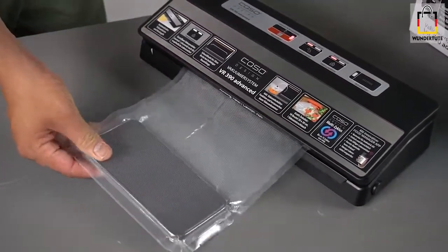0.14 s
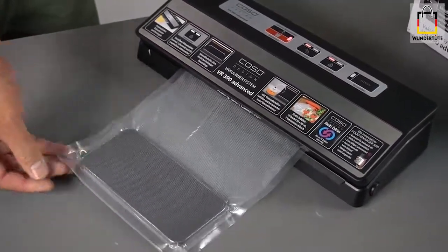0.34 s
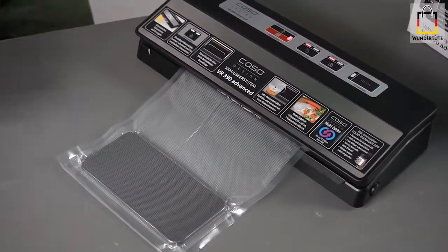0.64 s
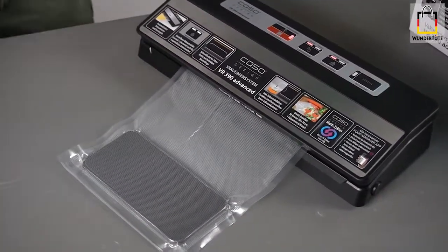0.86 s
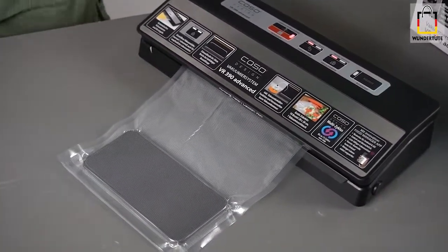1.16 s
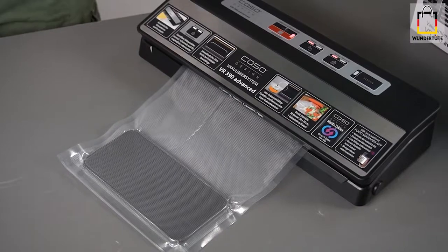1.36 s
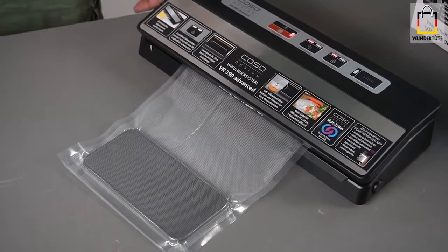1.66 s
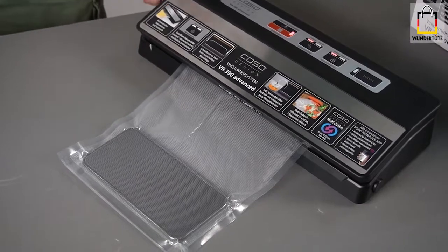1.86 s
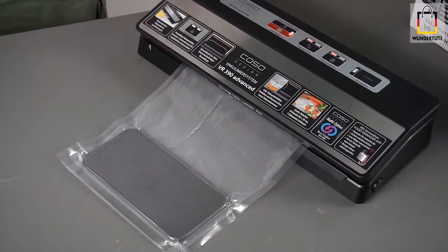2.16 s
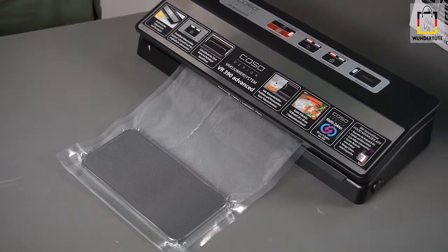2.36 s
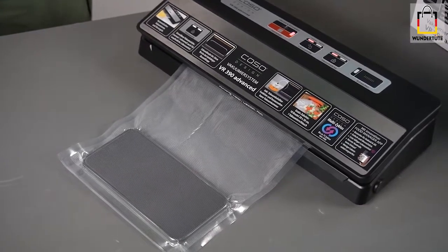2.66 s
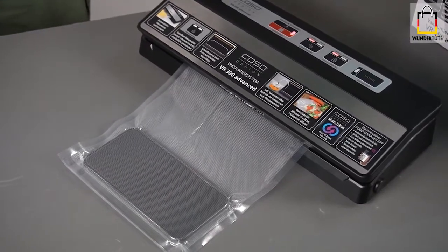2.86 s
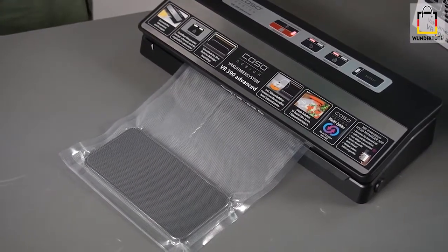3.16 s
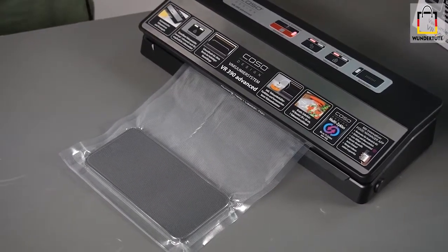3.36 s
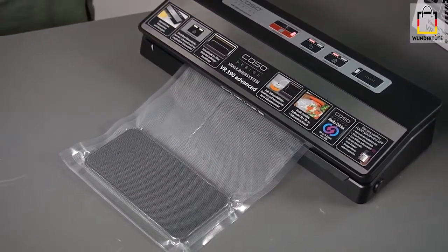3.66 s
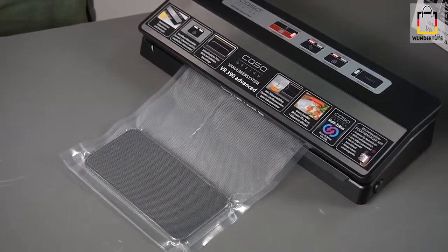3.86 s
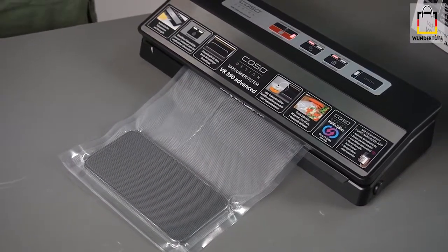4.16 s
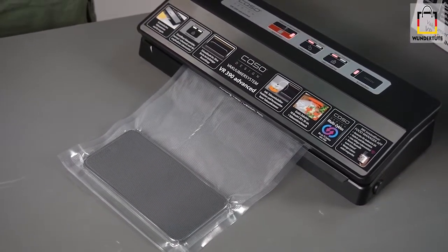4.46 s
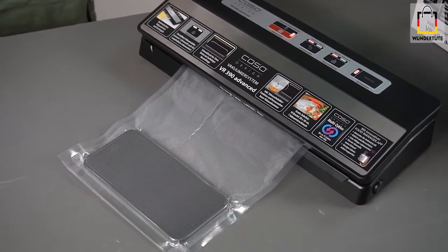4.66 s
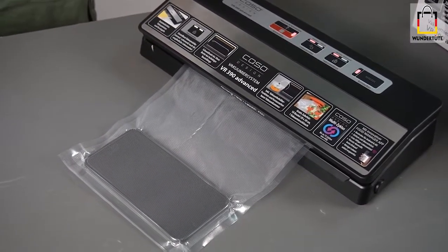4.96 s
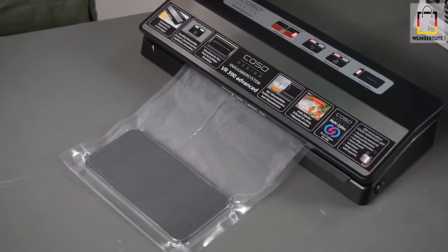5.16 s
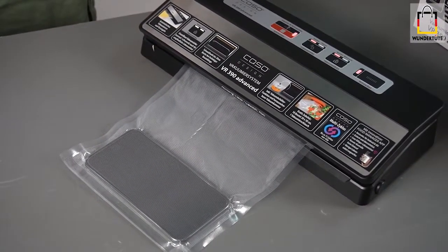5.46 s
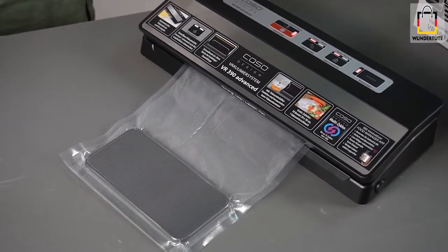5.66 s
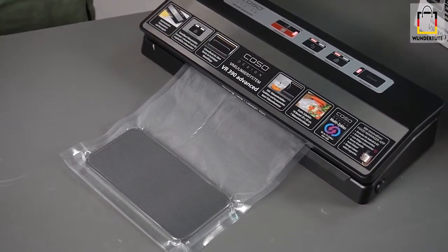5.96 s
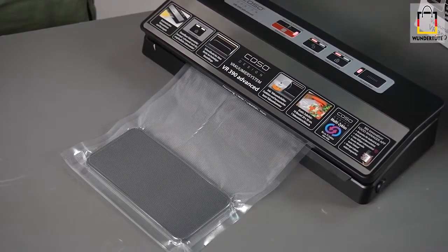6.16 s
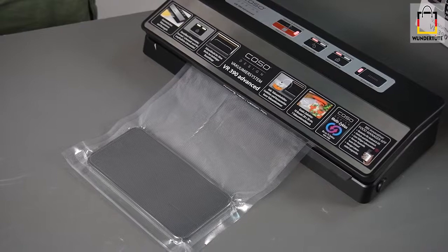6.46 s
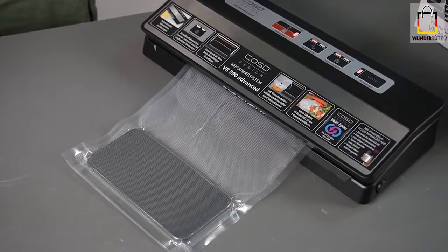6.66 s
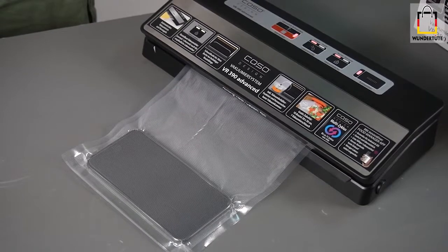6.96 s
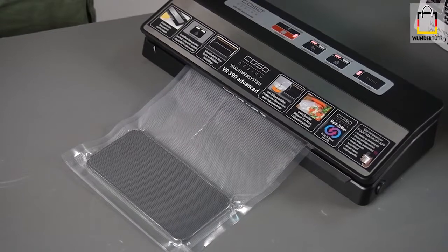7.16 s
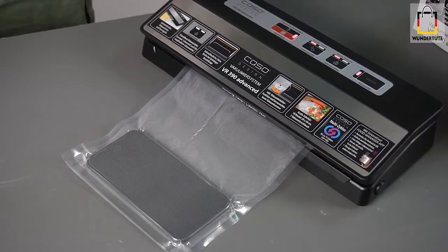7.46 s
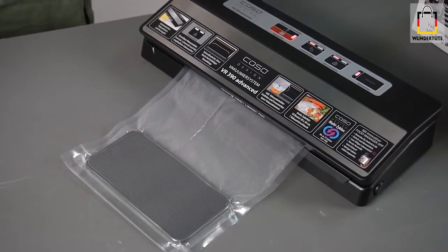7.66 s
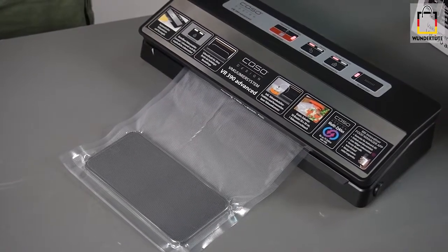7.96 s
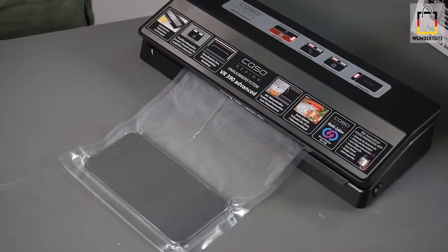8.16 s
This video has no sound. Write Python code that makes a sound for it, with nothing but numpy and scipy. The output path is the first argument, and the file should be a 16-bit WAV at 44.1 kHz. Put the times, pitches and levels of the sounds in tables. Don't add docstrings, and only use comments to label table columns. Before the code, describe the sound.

Close, steady mechanical drone of a small vacuum sealer, with a bag set down early, fading air hiss, and a slight pitch drop midway.

```python
import sys
import numpy as np
from scipy import signal
from scipy.fft import rfft, irfft, next_fast_len
from scipy.io import wavfile

SR = 44100
rng = np.random.default_rng(int(sys.argv[2]) if len(sys.argv) > 2 else 0)


def attenuation_scalar(level_db):
    decades = np.asarray(level_db, float) / 20
    return 10 ** decades


def pcm_store(signal):
    levels = np.round(np.clip(np.atleast_2d(signal), -1, 1) * 32767)
    wavfile.write(sys.argv[1], SR, levels.astype(np.int16).T)


N = 366471
TIME = np.arange(N) / SR
PAD = 4096


def knock(turns):
    # centre_hz, width_hz,
    # signed strength with the bag lifted, lowered, released, emptying
    base_loose = [(206, 52, -17, -15, -4, -6.5), (262, 7.6, -13, -7, -13, -21),
                  (378, 112, 20.1, 22, 10, 8.5), (450, 26, 12, -6, 1, 8), (525.2, 38.6, 16, 25, 34, 24.5),
                  (563.5, 61, -23, -25, -26, -21.5), (770, 137, 11, 13, 1.5, -3.5),
                  (783, 17, 1, -9, -20, 4.5), (868, 150, -11, -6, 0.5, 3.5), (963.5, 20, 4, -8, -15, -8.5),
                  (1135, 9.1, 6, 1, 26, 10), (1172.4, 11.4, -1, 3, 14, 30)]
    lid_loose = [(1250, 70, 4.5, -9, -2, 6), (1373, 51, -26, 12, 8, -2.5), (1415, 8.1, 22, 22, -16, -17),
                 (1533, 34, -7, -28, 14, 13), (1587, 38, 14, 7, -29.5, -1), (1650, 92, -17, -9, 0.5, -10.5),
                 (2093, 78, -1, -9.5, 4.5, 0.5), (2187, 58, -12, -17, -17, 15), (2198, 107, 1, 23, 6.5, -8),
                 (2348, 58, 3, -5.5, -5.5, 4), (2650, 210, -10, 1.7, 1, 1.5), (2880, 34, 0, 2.5, 2.5, -1),
                 (3065, 44, -5, 2.5, -2, 2.5)]
    # centre_hz, width_hz,
    # signed strength with the lid seating, seated, vacuum reached, wire heating
    base_tight = [(206.6, 16.7, -9, -9, -8.5, -4.5), (275, 45, -11, -10, -12.5, -11),
                  (358, 22.7, 10.5, 8, 9, 9), (436.2, 11.1, 16, 25, 29, 4.5),
                  (529.1, 49.1, 27, 28, 36, 35.5), (589, 105.5, -14, -12.5, -13, -23),
                  (616, 13, -2, -5, -3, 19), (707, 136, 11, 12.2, 8.5, 13),
                  (762, 121, -10, -9.5, -7.5, -11), (915.7, 14.6, 11.5, 20, 12.5, -4),
                  (1016.4, 21.3, -11, -4.5, 2.5, -7.5)]
    lid_tight = [(1179.9, 47.2, -61, -37, -40, -56.5), (1184.4, 20, 58, 52, 45, 46),
                 (1227, 163, 19, 11.5, 14.5, 19), (1351.3, 31, -30, -16, -25.5, -30),
                 (1441.6, 11.6, -16, -52, -43, -35.5), (1531.3, 20, -11, -20, -41, -26),
                 (1578, 73.5, 18, 7, 3.5, 42.5), (1597, 53, -8, 3.5, 10.5, -30.5),
                 (1687, 7.6, -20, -13, 1.2, -14), (1780, 150, -4, -3.5, -2, -3.0),
                 (1995, 11.3, -4, -4, -2, 8)]
    housing_tight = [(2163, 74, 0, 0.5, 2.5, -3), (2202, 22, 7, 7.5, 3, 2), (2307, 52, -3.5, -3.5, -3, -2),
                     (2467, 13, 2.5, 6, 4, 4.5), (2566, 105, 4, 4, 2, 2.5), (2598, 35, -5.5, -6, -4, -4),
                     (2840, 47, -3, -1.5, 0, -0.5), (2896, 21, -2, 1.5, 1.5, 2.5),
                     (3125, 51.5, -3, -4, -4, -3)]
    stroke_db = [0, -0.32, 0.81, 1.8, 0.02, -0.66, -0.78, -0.023]
    hits = strokes(turns, scatter_db=.15, jitter_s=4e-6)
    loose = flutter(ring(base_loose + lid_loose), gap_s=.0043, direct=0.83)
    tight = flutter(ring(base_tight + lid_tight + housing_tight), gap_s=.0017, direct=0.98)
    responses = np.r_[loose, table_top(tight)]
    rung = signal.oaconvolve(hits[None], responses, axes=1)[:, PAD:PAD + N]
    return 1.346 * attenuation_scalar(stroke_db) @ (shares() * rung)


def crank():
    start_rpm, empty_rpm, sag_rpm = 2331.2, 2452.47, 75.44
    emptying_s, bend, first_turn = .9723, 1.3414, .3157
    air_load = np.exp(-(TIME / emptying_s) ** bend)
    rpm = empty_rpm - (empty_rpm - start_rpm) * air_load - sag_rpm * wire()
    return np.cumsum(rpm) / 60 / SR - first_turn


def wire():
    on_s, rise_s = 4.3544, .0489
    return np.clip((TIME - on_s) / rise_s, 0, 1)


def shares():
    # time_s, state (0-6)
    suction = [
        (0, 1.22),
        (.29, 1.8),
        (.43, 1.6),
        (.52, 2.7),
        (.7, 2.75),
        (1.1, 3.57),
        (1.35, 3.9),
        (1.55, 4.13),
        (1.9, 5),
        (2.5, 5.93),
    ]
    state = np.interp(TIME, *np.transpose(suction)) + wire()
    return np.clip(1 - abs(state - np.arange(8)[:, None]), 0, 1)


def strokes(turns, scatter_db, jitter_s):
    whole = np.arange(-2, int(turns[-1]) + 1)
    early_turn = turns[0] - PAD * (turns[1] - turns[0])
    at = np.interp(whole, np.r_[early_turn, turns], np.r_[0, PAD + np.arange(N)])
    luck = rng.standard_normal((len(at), 2))
    at = at + jitter_s * SR * luck[:, 0]
    taps = np.floor(at)[:, None] + np.arange(-7, 9)
    offset = taps - at[:, None]
    shape = np.sinc(offset) * np.cos(offset * np.pi / 16) ** 2
    strength = shape * attenuation_scalar(scatter_db * luck[:, 1:])
    return np.bincount(taps.astype(int).ravel(), strength.ravel(), N + 2 * PAD)[:N + PAD]


def ring(modes):
    hz, width, *strength = np.transpose(modes)
    f = np.fft.rfftfreq(2 * PAD, 1 / SR)[:, None]
    resonance = 1j * f * width / (hz * hz - f * f + 1j * f * width)
    return irfft(np.array(strength) @ resonance.T)[:, :PAD]


def flutter(x, gap_s, direct):
    direct = np.clip(direct, .5, .99)
    late = lambda f: np.exp(-2j * np.pi * f * gap_s)
    return filtered(x, lambda f: (direct - late(f)) / (1 - direct * late(f)))


def table_top(x):
    # centre_hz, width_hz
    lingering = [(285, 32), (760, 58), (2000, 87), (2320, 87), (2720, 110)]

    def delay(f):
        stages = [(c * c - f * f - 1j * f * w) / (c * c - f * f + 1j * f * w) for c, w in lingering]
        return np.prod(stages, axis=0)

    return filtered(x, delay)


def chatter(turns):
    # frequency_hz, level_db (per Hz)
    loose_colour = [(1880, -38), (3200, 3), (3610, 9), (3880, 1), (4380, 4.5), (4590, -5), (4750, -16),
                    (5140, 2), (7040, 4), (7570, -6), (8300, 9), (9130, -2), (10900, -5), (14800, -21),
                    (15800, -31)]
    tight_colour = [(1880, -11), (3200, 8), (3290, -9.5), (3500, -4.5), (4530, -12), (4940, -11.5),
                    (5350, -5), (5840, -9), (6450, -4.5), (8100, -2.5), (9890, -9.5), (10600, -17),
                    (12800, -19), (14600, -6.5), (15800, -28)]
    # frequency_hz, t60_s
    decay = [(2000, 0.63), (3000, 0.14), (4000, 0.17), (4500, 0.29), (5200, 0.06), (9000, 0.079),
             (11000, 0.062), (14500, 0.046)]
    bracket_gain = [6, 8, 2, 5.5]
    valve_db = [-35, -37, -32.5, -36, -43, -39.5, -40, -39.5]
    hz, t, z = signal.stft(rng.standard_normal((8, PAD)), SR, nperseg=64)
    fading = z * attenuation_scalar(-60 * t / along(decay, hz)[:, None])
    burst = signal.istft(fading, SR, nperseg=64)[1][:, :PAD]
    burst = burst * (1 - np.exp(-np.arange(PAD) / SR / 0.00072)) ** 2
    early = PAD + round(.002 * SR)
    hits = strokes(turns, scatter_db=.8, jitter_s=3e-6)
    rattle = signal.oaconvolve(np.pad(hits, (0, PAD))[None], burst, axes=1)[:, early:early + N]
    rattle = rattle.reshape(4, 2, N)
    weight = shares().reshape(4, 2, N).sum(1)
    weight = weight / np.sqrt((weight ** 2).sum(0))
    total = 0
    for k, colour in enumerate([loose_colour, loose_colour, tight_colour, tight_colour]):
        def response(f):
            bracket = 1 + bracket_gain[k] * 1j * f * 60 / (4480 ** 2 - f * f + 1j * f * 50)
            low = np.where(f > 3250, 1, attenuation_scalar(-8) * (f > 1900))
            return attenuation_scalar(along(colour, np.maximum(f, 3300))) * low * bracket

        total = total + weight[k] * unit(filtered(rattle[k], response))
    return attenuation_scalar(valve_db @ shares()) * pair(*total)


def thumps():
    # start_s, peak_db, pitch_hz, t60_s, scuff_db
    contacts = [(0.179, -7.5, 333, 0.12, -7.5), (0.208, -15, 300, 0.12, -9), (0.367, -11, 336, 0.091, -14),
                (0.389, -7, 302, 0.17, -10), (0.414, -11, 283, 0.136, -6), (0.4385, -2, 430, 0.05, -1.5),
                (0.452, -5, 286, 0.21, -6), (0.469, -8, 358, 0.17, -3), (0.489, -9, 298, 0.11, -10),
                (0.504, -13.5, 350, 0.12, 1), (0.544, -13.5, 267, 0.11, -12.0), (0.574, -19, 272, 0.1, -15)]
    out = np.zeros(N + PAD)
    t = np.arange(PAD) / SR
    for s, db, hz, t60, scuff_db in contacts:
        luck = rng.standard_normal((2, PAD))
        rumble = unit(filtered(luck[0], lambda f: (1j * f * 300 / (hz * hz / 2 - f * f + 1j * f * 300)) ** 2))
        scuff = unit(filtered(luck[1], lambda f: 1j * f / (1 + 1j * f / 1300) ** 4))
        scuff = attenuation_scalar(scuff_db - 60 * t / 0.17) * scuff
        note = np.sin(2 * np.pi * hz * t) + 0.82 * rumble
        onset = 1 - np.exp(-t / 0.0025)
        out[round(s * SR):][:PAD] += attenuation_scalar(db - 8.0) * onset * (note * attenuation_scalar(-60 * t / t60) + scuff)
    return out[:N]


def air(turns):
    # frequency_hz, level_db (per Hz)
    noise_colour = [(22, -14), (45, -4), (130, -5), (260, -1.5), (450, -9), (900, -10.5), (1450, -7.5),
                    (1900, -11.5), (2600, -12.5), (3050, -19), (3350, -26.5), (4500, -21), (5200, -28),
                    (8500, -26), (11000, -39), (15900, -39)]
    noise = filtered(rng.standard_normal((2, N)), lambda f: attenuation_scalar(along(noise_colour, f)))
    noise = pair(*unit(noise))
    treble = filtered(noise, lambda f: 1 / (1 + (4000 / (f + 1)) ** 4))
    phase = (turns + 0.034) % 1
    puff = unit(.3 + np.exp(-phase / .2) * (1 - np.exp(-phase / .05)))
    puffing = treble * puff * attenuation_scalar(flow_db() + 43.5)
    return attenuation_scalar(-35) * (noise + puffing - treble)


def flow_db():
    # centre_s, rise_db, half_length_s
    rustles = [
        (.16, 4, 0.056),
        (0.364, 8, 0.11),
        (1.317, 6, .04),
        (1.75, 3, 0.27),
    ]
    vacuum_db, full_bag_db, fading_s = -40.5, 9.5, .7
    outflow = vacuum_db + full_bag_db * np.exp(-TIME / fading_s)
    return outflow + sum(db * np.exp(-((TIME - s) / half) ** 2) for s, db, half in rustles)


def hum(turns):
    # speed_multiple, level_db (rms)
    unbalance = [(1, -48), (2, -42), (3, -42.5), (4, -78)]
    # frequency_hz, level_db (rms)
    mains = [(50, -61), (100, -35), (150, -37)]
    shake = sum(attenuation_scalar(db - 2) * np.sin(2 * np.pi * k * turns) for k, db in unbalance)
    return shake + sum(attenuation_scalar(db - 13.5) * np.sin(2 * np.pi * hz * TIME) for hz, db in mains)


def walls(x):
    # frequency_hz, level_db
    echo_colour = [(150, -60), (300, -40), (520, -21), (700, -16), (1500, -13), (2200, -4), (5000, -5)]
    t = np.arange(PAD) / SR
    tail = rng.standard_normal(PAD) * attenuation_scalar(-60 * t / .12)
    echo = signal.fftconvolve(x, tail / np.linalg.norm(tail))[:N]
    return filtered(echo, lambda f: attenuation_scalar(along(echo_colour, f))) * np.array([[-1], [1]])


def pair(mid, side):
    # frequency_hz, coherence (0-1)
    likeness = [(300, 1), (450, .97), (1500, .8), (4000, .5), (12000, .5)]

    def turn(f):
        angle = np.arccos(np.clip(along(likeness, f), -1, 1)) / 2
        return np.array([np.cos(angle), np.sin(angle)])

    a, b = filtered(np.array([mid, side]), turn)
    return np.array([a + b, a - b])


def along(points, hz):
    f, v = np.transpose(points)
    return np.interp(np.log(hz + 1), np.log(f + 1), v)


def unit(x):
    return x / np.sqrt(np.mean(x ** 2) + 1e-20)


def filtered(x, response):
    m = next_fast_len(x.shape[-1] + 2 * PAD)
    return irfft(rfft(x, m) * response(np.fft.rfftfreq(m, 1 / SR)), m)[..., :x.shape[-1]]


def ducking():
    start_s, depth_db, drop_s, back_s = 0.44, -7.5, 0.007, 0.052
    t = np.maximum(TIME - start_s, 0)
    return attenuation_scalar(depth_db * (1 - np.exp(-t / drop_s)) * np.exp(-(t / back_s) ** 2))


def scene():
    turns = crank()
    body = knock(turns) + thumps()
    return body + walls(body) + chatter(turns) + air(turns) + hum(turns)


def top_cut(x):
    return signal.sosfilt(signal.butter(12, 15940, fs=SR, output="sos"), x)


def record(dry):
    # frequency_hz, level_db
    lean = [(210, 0), (330, 1), (500, -2.2), (770, -.6), (1170, -.6), (1790, -2.4), (2740, -1.0),
            (4190, 0.7), (6410, 5.0), (9810, 8.2), (15000, 0)]
    # frequency_hz, lead_rad
    lead = [(250, 0), (550, -.15), (2580, 0.1), (4050, -0.0), (4650, -1.2), (6460, -1.4), (7320, -1.3),
            (7840, -0.6), (8440, 5.8), (9560, 5.9), (10600, 4.7), (11300, 6.7), (12200, 6.9), (14000, 6.3),
            (15500, 6.1)]

    def tilt(f):
        left = attenuation_scalar(along(lean, f) / 2) * np.exp(.5j * along(lead, f))
        return left ** np.array([[1], [-1]])

    mix = filtered(dry, tilt) * ducking()
    return top_cut(mix)


dry = scene()
out = record(dry)
pcm_store(out)
```